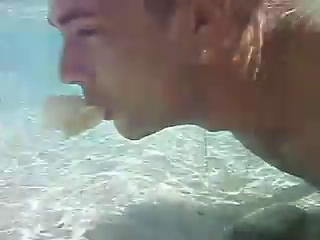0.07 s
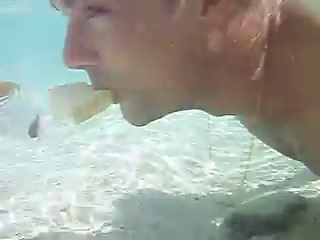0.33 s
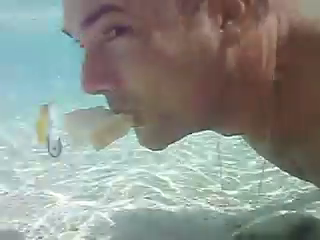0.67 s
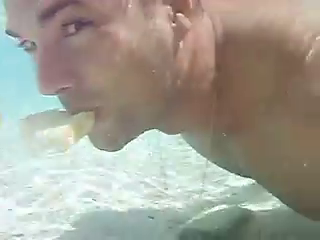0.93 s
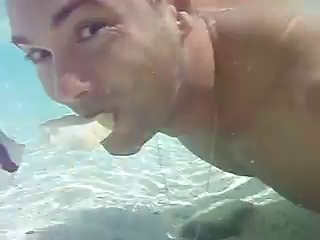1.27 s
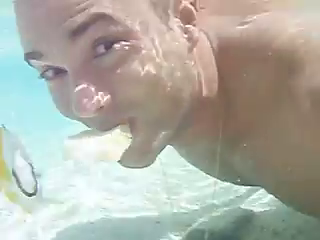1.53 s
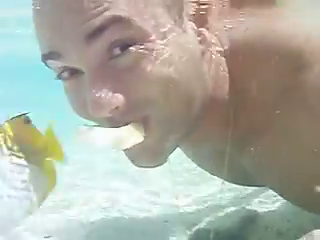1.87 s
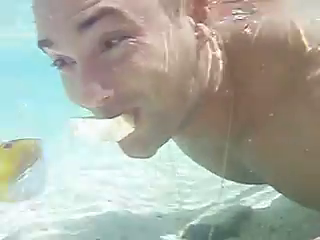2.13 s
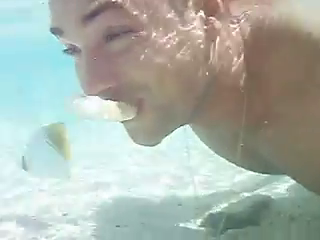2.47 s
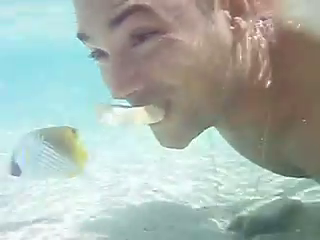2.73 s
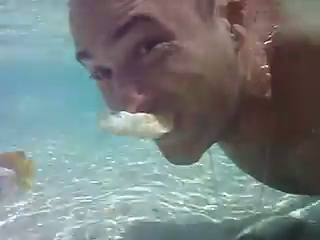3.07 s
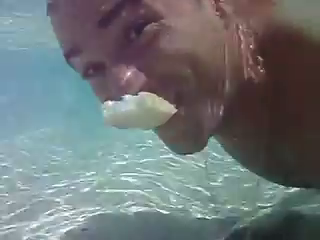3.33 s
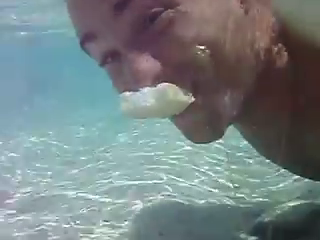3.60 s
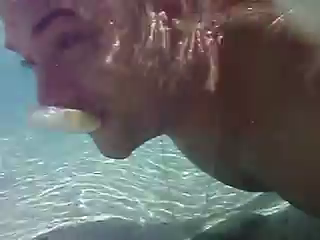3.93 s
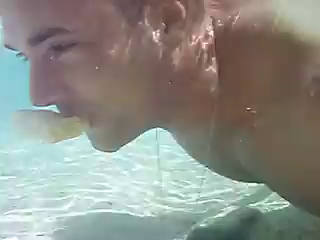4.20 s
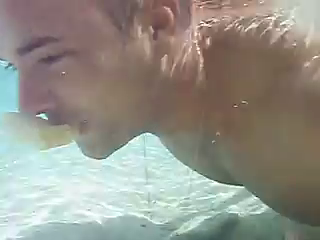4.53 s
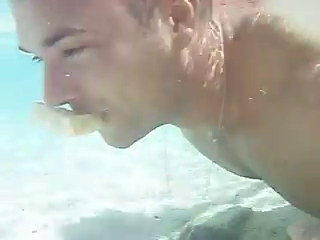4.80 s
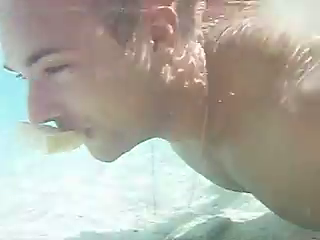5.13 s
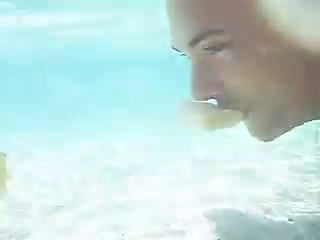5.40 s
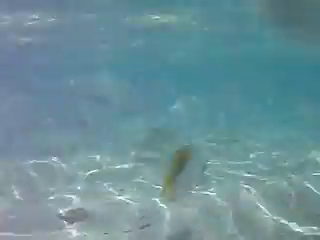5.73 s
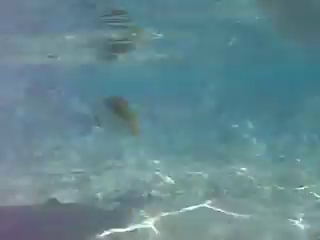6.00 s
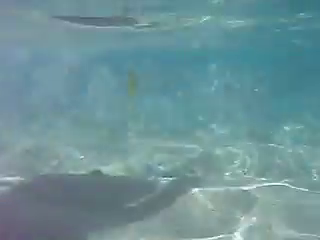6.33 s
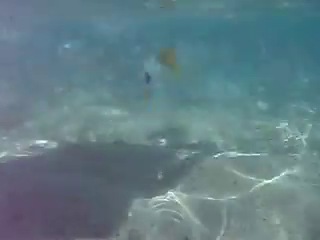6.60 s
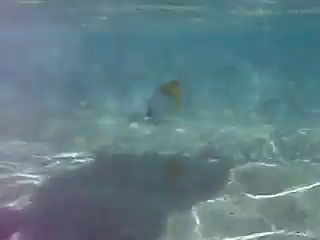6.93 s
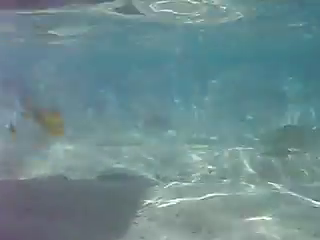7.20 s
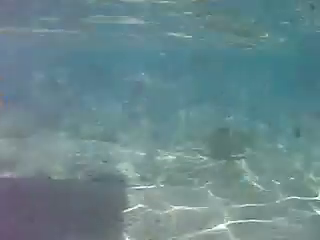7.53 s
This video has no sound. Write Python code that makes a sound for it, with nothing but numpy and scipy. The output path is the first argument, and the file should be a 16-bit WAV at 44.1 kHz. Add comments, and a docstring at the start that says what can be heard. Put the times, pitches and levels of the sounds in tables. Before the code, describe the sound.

A soft knock and a hollow, mid-pitched boom open the sound, heard from inside a waterproof camera housing in shallow sea water. The boom wavers throughout, over a low rumble and faint microphone hiss. A sharp finger knock lands at 0.8 seconds, and softer ones with a dull slop and faint bubbles around 1.6 to 1.8. After a quieter stretch, hollow knocks and bumps on the plastic come in clusters from 3.2 seconds, with a few ticks. Bubbles glug between 4.1 and 4.7, and water thuds against the wall around 5. From 5.5 the camera swings round: boom and surge swell, fingers rub, more bubbles pass, and knocks crowd together, the hardest overloading the microphone at 6 and 6.3. Another surge with knocks and bubbles comes around 7, easing by 7.8. Brief digital clicks occur near 1, 5 and 7 seconds. Everything sounds muffled and close.

```python
"""A soft knock and a hollow boom, heard from inside a waterproof camera housing in shallow sea water.
The camera is held, then swung round, and the moving water keeps the housing booming near 450 Hz.
Fingers knock and rub on the plastic, with a few ticks; just outside, water slops against the wall,
bubbles glug past and a low surge rumbles. The narrow-band microphone hisses and the hardest knocks
overload it; brief digital skips click, mostly in pairs about 8 ms apart."""
import sys
import numpy as np
from scipy import signal
from scipy.fft import rfft, irfft, next_fast_len
from scipy.io import wavfile
from scipy.ndimage import uniform_filter1d, map_coordinates

SR = 44100
rng = np.random.default_rng(int(sys.argv[2]) if len(sys.argv) > 2 else 0)


def dump(signal):
    """Clip the signal to [-1, 1] and save it as 16-bit WAV at the path in sys.argv[1]."""
    limited = np.clip(np.atleast_2d(signal).T, -1, 1)
    pcm = np.round(limited * 32767).astype(np.int16)
    wavfile.write(sys.argv[1], SR, pcm)


N = 342216


def housing_boom(boom_db, blows, limit_level=0.3, duck_db=-14):
    """Eddies and soft bumps keep the housing booming all round the microphone."""
    # The wall's response to the water. Each row: frequency in Hz, spectral level in dB.
    spectrum = [(150, -49), (300, -17.5), (370, -11.5), (415, -4), (450, 3), (490, -2), (530, -7.5),
                (590, -34), (800, -43), (1300, -72)]
    eddies = rng.standard_normal(N) * amp(2.4 * wobble(40))
    boom = amp(boom_db + 0.5) * coloured(eddies, spectrum) + grip_bumps(boom_db)
    # The boom's loudest swells are softly limited, and it dips under each knock.
    envelope = np.abs(signal.hilbert(boom))
    limit = (1 + (envelope / limit_level) ** 4) ** (1 / 4)
    duck = 1 + (uniform_filter1d(np.abs(blows), size=400) / amp(duck_db)) ** 2
    return boom / (limit * duck)


def housing_ring(rise_ms, pitch_hz, nominal_hz=480):
    """One blow rings the housing; soft blows swell slowly, and the grip shifts the pitch a little."""
    # The housing's modes at the nominal pitch. Each row: frequency in Hz, width in Hz, level in dB.
    modes = [(452, 127, 2), (494.1, 83.3, 4.5), (684, 170, -9), (970, 4200, -15)]
    hz, width, db = np.transpose(modes)[:, :, None]
    t = np.arange(SR // 10) / SR
    sign = np.array([[1], [-1], [-1], [-1]])  # the two lowest modes swing against each other and beat
    decay = amp(db) * np.exp(-np.pi * width * t)
    swings = sign * decay * np.sin(2 * np.pi * hz * pitch_hz / nominal_hz * t)
    onset = 1 - np.exp(-(1000 * t / rise_ms) ** 2)
    return swings.sum(0) * onset


def finger_knocks():
    """Fingers strike the housing, centimetres from the microphone."""
    # Each row: start in seconds, peak in dB, rise time in ms, ring pitch in Hz.
    blows = [ (0.014, -8, 1.9, 490), (0.781, 1, 0.17, 488), (1.611, -5, 2.5, 464), (1.806, -9, 1.24, 476),
             (1.982, -17.5, 0.7, 580), (3.173, -3, 1.14, 504), (3.297, -6.5, 0.55, 499),
             (3.524, -7, 4.8, 450), (3.618, -11, 1.7, 452), (3.734, -13, 1.3, 423), (3.863, -1, 7, 461),
             (3.954, -0.5, 0.27, 498), (3.994, -1.5, 2.7, 462), (4.094, -4.5, 2.8, 455),
             (4.113, -7.5, 1.2, 502), (4.378, -8, 12, 474), (4.681, -2, 4.4, 448), (4.797, -4.5, 23, 463),
             (5.040, -7, 6, 454), (5.151, -7.5, 23, 467), (5.290, -0.5, 0.61, 497), (5.627, -9, 2.4, 485),
             (5.781, -0.5, 0.75, 509), (5.836, -6.5, 5.4, 503), (5.877, -2, 5.6, 528),
             (5.895, -1, 1.4, 525), (5.94, -6.5, 2, 530), (5.988, 1, 1.8, 484.5), (6.008, 8.5, 2.5, 468),
             (6.142, -1.5, 1.6, 480), (6.334, 3.5, 2.1, 446.5), (6.379, 1.5, 0.18, 463.5),
             (6.509, -7.5, 1.1, 577), (6.531, -2.5, 0.84, 495), (6.736, -3.5, 7.8, 488),
             (6.972, -6, 4.2, 464), (7.086, -0.5, 3.8, 497), (7.150, -3.5, 5, 519), (7.171, -2, 2.2, 516),
             (7.203, -6, 2.5, 533), (7.545, -15.5, 1.2, 544), (7.562, -8, 7.1, 448)]
    track = np.zeros(N)
    for start, peak_db, rise_ms, pitch_hz in blows:
        add(track, start, peak_db, housing_ring(rise_ms, pitch_hz))
    return track


def grip_bumps(boom_db, count=26, over_db=4, growth=1.5, spread_db=2, pitch_spread=0.045):
    """Soft chance bumps of the shifting grip, more frequent and stronger as the camera moves harder."""
    track = np.zeros(N)
    motion_so_far = np.cumsum(amp(boom_db) - amp(boom_db.min()))
    peak_db = boom_db.mean() + growth * (boom_db - boom_db.mean()) + over_db
    for k, (when, size, tune) in enumerate(rng.random((count, 3))):
        i = np.searchsorted(motion_so_far, motion_so_far[-1] * (k + when) / count)
        bump = housing_ring(rise_ms=4.8, pitch_hz=490 * (1 + pitch_spread * (2 * tune - 1)))
        add(track, i / SR, peak_db[i] + spread_db * (2 * size - 1), bump)
    return track


def water_slops():
    """Water slops against the outside of the housing in dull thuds."""
    # Each row: start in seconds, peak in dB, pitch in Hz.
    thuds = [(1.611, -17, 280), (1.747, -23.5, 130), (1.755, -28.5, 60.7), (3.204, -19, 178),
             (3.232, -26.5, 75.6), (3.997, -15.5, 305), (4.694, -14, 203), (5.001, -8.5, 247),
             (5.013, -12, 243), (5.625, -21, 108), (5.755, -21, 93), (5.785, -17.5, 133),
             (5.988, -14, 234.3), (6.140, -12.5, 170.7), (6.334, -16.5, 282), (6.834, -12, 206),
             (7.045, -17, 112.4), (7.188, -15, 117), (7.202, -11, 222.5)]
    return pulses(thuds, decay_cycles=0.68, rise_cycles=0.56)


def finger_rub(rub_db, slips_per_s=500, spread_db=3, uneven_db=2):
    """Skin creeps over the plastic in tiny slips of uneven size, which excite the upper resonances."""
    # The rubbed plastic. Each row: frequency in Hz, spectral level in dB.
    spectrum = [(300, -49), (470, -11), (540, 4.5), (610, -4.5), (680, 1.5), (730, -9), (790, -2),
                (880, -14), (1000, -20.5), (1500, -31), (3000, -51.5)]
    slips = (rng.random(N) < slips_per_s / SR) * rng.choice([-1, 1], N)
    sizes = amp(spread_db * rng.standard_normal(N) + uneven_db * wobble(18))
    return amp(rub_db + 1) * coloured(slips * sizes, spectrum)


def bubbles(count=4, later_db=-3, smaller_db=6, pitch_spread=0.14, glide_per_s=0.72, swell_s=0.0096):
    """A big bubble leads each run past the housing, smaller and higher ones follow; each note rises."""
    # Each row: start in seconds, length in seconds, first bubble's peak in dB, its pitch in Hz.
    runs = [(1.62, 0.19, -29, 714), (3.555, 0.071, -31.5, 767), (4.118, 0.17, -18, 661),
            (4.38, 0.085, -18, 652), (4.645, 0.1, -22, 698), (5.862, 0.33, -16.5, 653),
            (7.049, 0.16, -16.5, 688), (7.386, 0.081, -27.5, 686), (7.539, .12, -23.5, 694)]
    track, t = np.zeros(N), np.arange(SR // 6) / SR
    envelope = (t / swell_s * np.exp(-t / swell_s)) ** 2
    for start, length, db, first_hz in runs:
        notes = [(start, db, first_hz)]
        for k, (when, small) in enumerate(rng.random((count - 1, 2)), 1):
            at = start + length * (k + when) / count
            notes.append((at, db + later_db - smaller_db * small, first_hz * (1 + pitch_spread * small)))
        for at, peak_db, hz in notes:
            add(track, at, peak_db, envelope * np.sin(2 * np.pi * hz * t * (1 + glide_per_s * t / 2)))
    return track


def sharp_ticks():
    """Small, bright ticks that ring for only a few cycles."""
    # Each row: start in seconds, peak in dB, pitch in Hz.
    ticks = [ (0.782, -18.5, 3840), (1.514, -31.5, 3260), (1.614, -24.5, 3250), (3.176, -20.5, 2580),
             (3.297, -22.5, 2500), (5.234, -24.5, 1360), (6.351, -20, 1400), (6.399, -27.5, 1400)]
    return pulses(ticks, decay_cycles=1.4, rise_cycles=2.1)


def digital_skips(fall_s=0.0005):
    """Brief digital skips click, mostly in pairs: each click is a step that falls back with no ring."""
    # Each row: start in seconds, peak in dB.
    clicks = [(1.036, -22), (1.044, -21.5), (3.996, -39), (4.685, -28.5), (5.036, -17.5), (5.044, -16.5),
              (7.036, -13.5), (7.045, -12), (7.188, -20)]
    track, t = np.zeros(N), np.arange(SR // 100) / SR
    for start, peak_db in clicks:
        add(track, start, peak_db, np.exp(-t / fall_s))
    return track


def water_surge(surge_db):
    """Water displaced by the camera rumbles low around it."""
    # Each row: frequency in Hz, spectral level in dB.
    spectrum = [(12, -32), (30, -4.5), (65, 2), (120, 2), (220, 4), (330, -3), (480, -7), (800, -36),
                (1500, -68.5)]
    swirl = rng.standard_normal(N) * amp(1.7 * wobble(19))
    return amp(surge_db) * coloured(swirl, spectrum)


def motion_levels(brisk_effort_db=-35, attack_share=0.2, release_s=0.035):
    """Boom, rubbing and surge in dB: a resting level, a part that grows with effort, and the shoves."""
    # How briskly the camera is moved. Each row: time in seconds, effort in dB.
    effort = [(0.0, -48), (0.5, -57), (1.86, -51.5), (2.27, -56), (3.15, -55.5), (3.46, -46), (3.89, -50),
              (4.26, -38.5), (5.4, -42.5), (5.57, -45.5), (5.77, -29), (5.94, -28), (6.11, -34),
              (6.38, -34), (6.68, -42.5), (7.09, -37), (7.37, -44), (7.76, -40.5)]
    # Shoves through the water. Each row: start and length in seconds, then boom, rubbing and surge in dB.
    shoves = [(0.0, .05, -16.5, -38.5, -38), (.36, .1, -24.5, -45, -40.5), (.85, .6, -24, -59.5, -42.5),
              (1.567, .2, -25, -45.5, -38), (3.209, .08, -25, -56, -36.5), (3.386, .24, -28.5, -41, -39),
              (4.62, .19, -13, -34, -32), (4.97, .1, -18, -47, -42), (5.528, .46, -20, -29.5, -26.5),
              (6.045, .11, -21, -25.5, -31), (6.289, .07, -19.5, -35.5, -34),
              (6.502, .055, -18.5, -22, -32.5), (6.698, .22, -19, -39, -32), (6.958, .26, -12.5, -31, -25)]
    # Each law: resting level in dB, moving part at brisk effort in dB, its growth in dB per dB of effort.
    boom_law, rub_law, surge_law = (-28, -21, 0.65), (-59, -33, 1), (-39, -42.5, 2.4)
    t = np.arange(N) / SR
    above_brisk_db = np.interp(t, *np.transpose(effort)) - brisk_effort_db
    power = np.array([amp(rest_db) ** 2 + amp(brisk_db + growth * above_brisk_db) ** 2
                      for rest_db, brisk_db, growth in (boom_law, rub_law, surge_law)])
    for start, length, *layer_db in shoves:
        attack = np.clip((t - start) / (attack_share * length), 0, 1)
        release = np.exp(-np.maximum(t - start - length, 0) / release_s)
        power += np.outer(amp(layer_db), attack * release) ** 2
    return 10 * np.log10(power)


def pulses(rows, decay_cycles, rise_cycles):
    """Heavily damped swings that build up and die within a few cycles."""
    track, t = np.zeros(N), np.arange(SR // 10) / SR
    for start, peak_db, hz in rows:
        cycles = hz * t
        envelope = np.exp(-cycles / decay_cycles) * (1 - np.exp(-cycles / rise_cycles))
        add(track, start, peak_db, envelope * np.sin(2 * np.pi * cycles))
    return track


def amp(db):
    """Decibels to gain."""
    return 10 ** (np.asarray(db) / 20)


def wobble(knots_per_s):
    """A smooth random curve."""
    knots = rng.standard_normal(int(N * knots_per_s / SR) + 4)
    return map_coordinates(knots, [np.arange(N) * knots_per_s / SR])


def filtered(x, response):
    """x through a filter whose gain is response(hz)."""
    size = next_fast_len(N + SR // 2)
    return irfft(rfft(x, size) * response(np.fft.rfftfreq(size, 1 / SR)), size)[:N]


def coloured(x, spectrum):
    """x shaped by (Hz, dB) points on a log axis, at rms 1."""
    points_hz, db = np.transpose(spectrum)
    shaped = filtered(x, lambda hz: amp(np.interp(np.log(hz + 1), np.log(points_hz), db)))
    return shaped / np.sqrt(np.mean(shaped ** 2) + 1e-20)


def add(track, start_s, peak_db, sound):
    """Mix a sound into the track at start_s with its peak at peak_db."""
    part = track[round(start_s * SR):][:len(sound)]
    part += (amp(peak_db) * sound / np.abs(sound).max())[:len(part)]


def scene():
    """Water and fingers reach one microphone through the housing; the digital skips are added on top."""
    boom_db, rub_db, surge_db = motion_levels()
    blows = finger_knocks()
    boom = housing_boom(boom_db, blows)
    water = water_surge(surge_db) + bubbles() + water_slops()
    return (boom + blows + water + finger_rub(rub_db) + sharp_ticks() + digital_skips())[None]


def record(dry, hiss_db=-51, band_hz=4200, ceiling=0.71, knee=24, leak_db=-5, top_hz=15800):
    """A hissing, narrow-band microphone; overloads flatten the peaks and crackle faintly above its band."""
    def band(hz):
        return 1 / np.sqrt(1 + (hz / band_hz) ** 70)

    # The microphone's own noise. Each row: frequency in Hz, spectral level in dB.
    spectrum = [(200, -0.5), (1000, 1.5), (2000, 1), (3500, -0.5), (4000, -6), (4500, -16)]
    hiss = amp(hiss_db) * coloured(rng.standard_normal(N), spectrum)
    heard = filtered(dry[0] + hiss, band)
    clipped = heard / (1 + np.abs(heard / ceiling) ** knee) ** (1 / knee)
    return filtered(clipped, lambda hz: np.maximum(band(hz), amp(leak_db)) * (hz < top_hz))[None]


dry = scene()
out = record(dry)
dump(out)
```